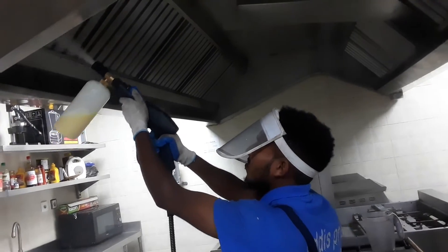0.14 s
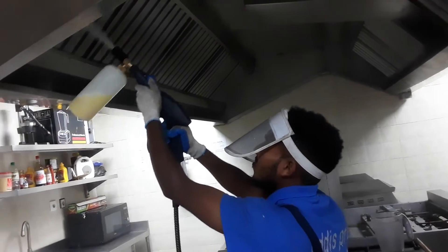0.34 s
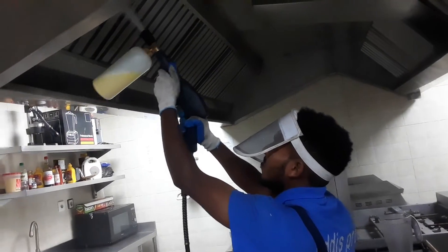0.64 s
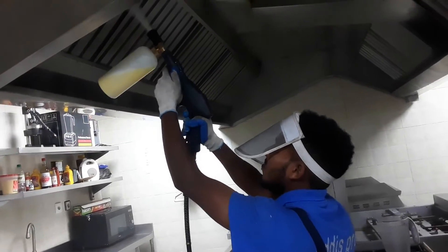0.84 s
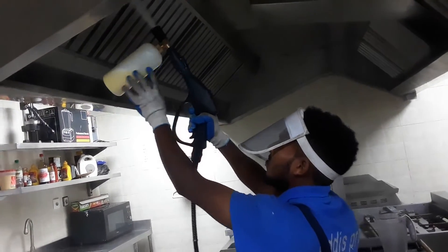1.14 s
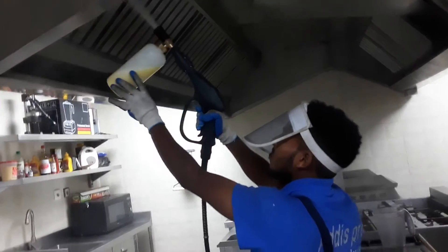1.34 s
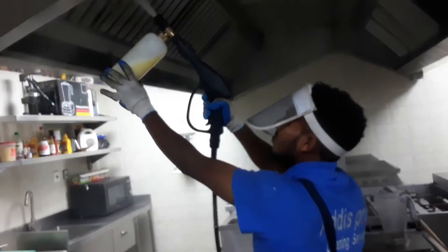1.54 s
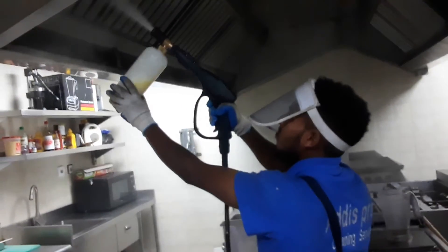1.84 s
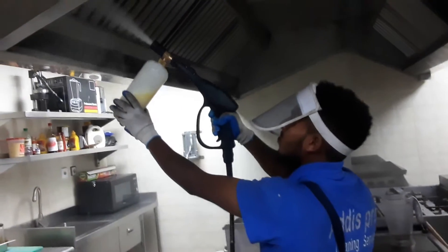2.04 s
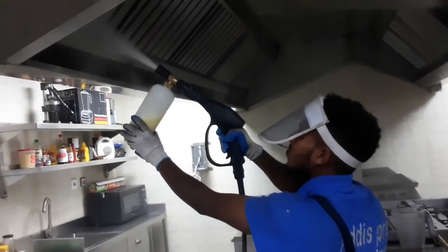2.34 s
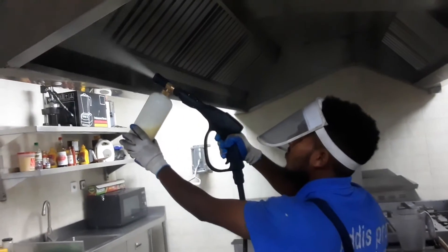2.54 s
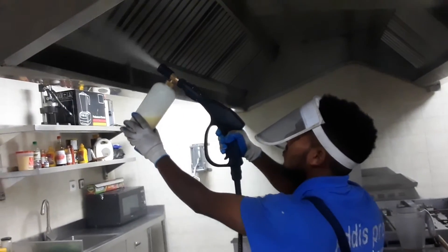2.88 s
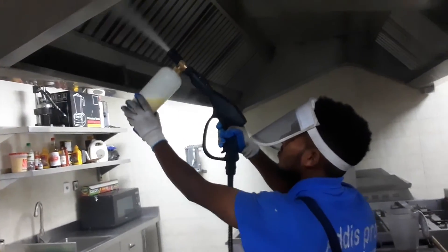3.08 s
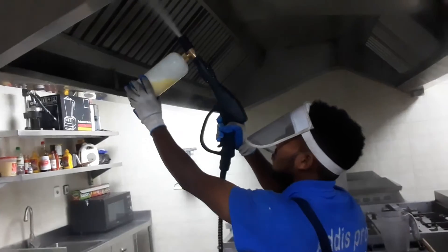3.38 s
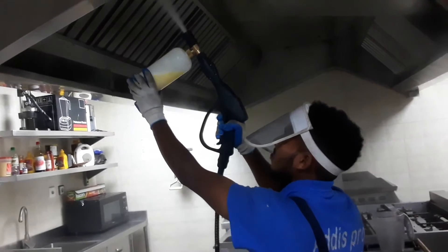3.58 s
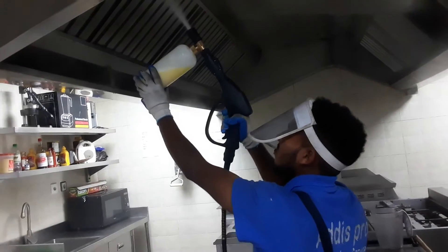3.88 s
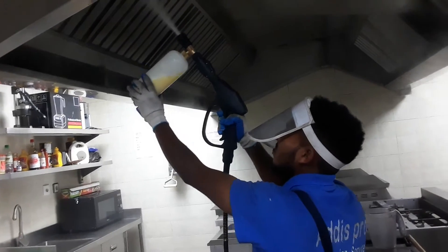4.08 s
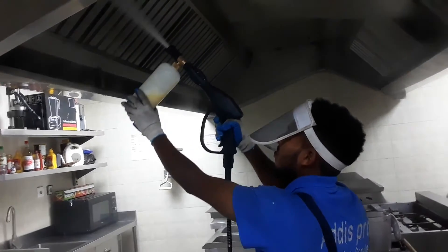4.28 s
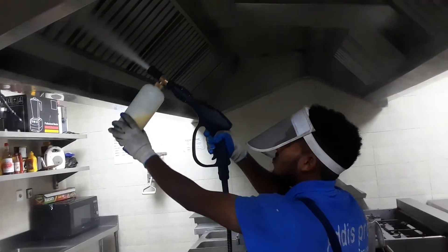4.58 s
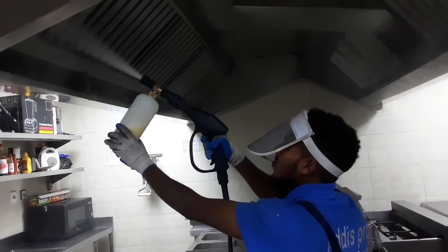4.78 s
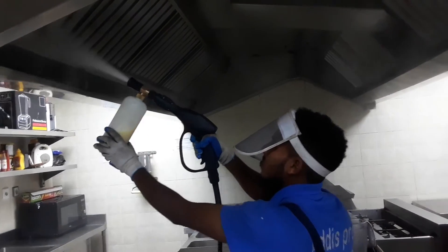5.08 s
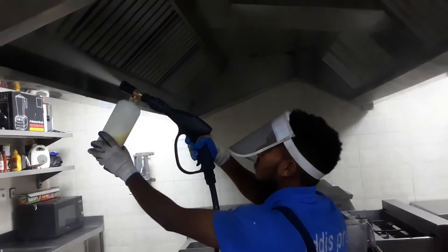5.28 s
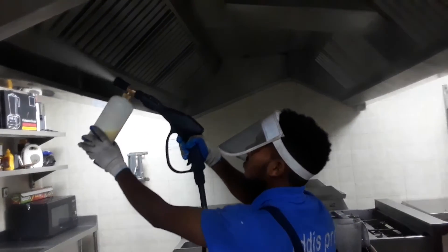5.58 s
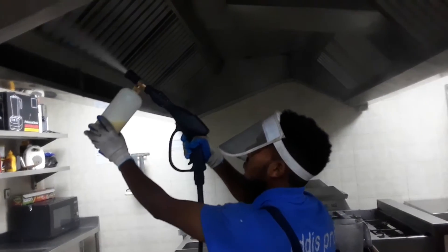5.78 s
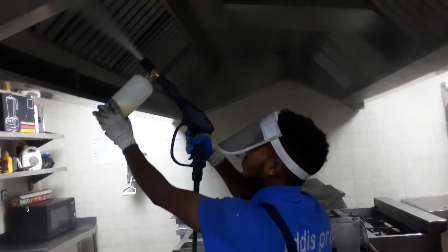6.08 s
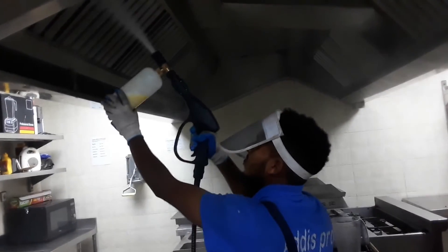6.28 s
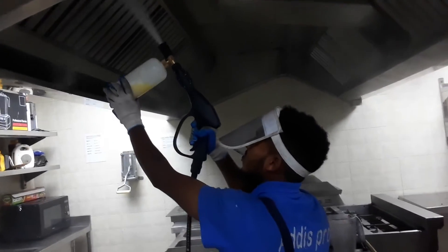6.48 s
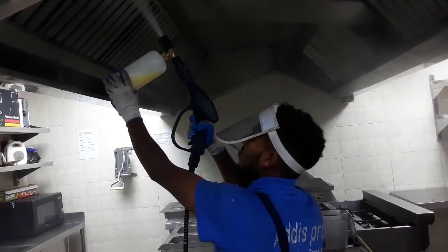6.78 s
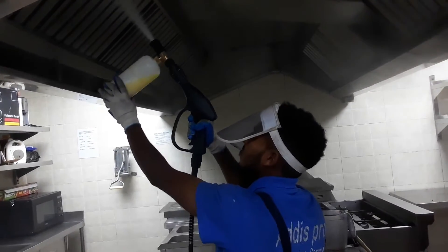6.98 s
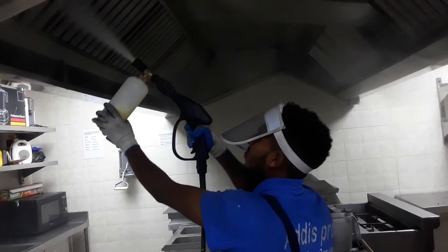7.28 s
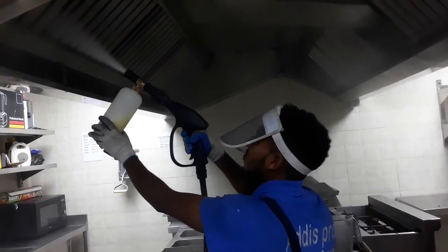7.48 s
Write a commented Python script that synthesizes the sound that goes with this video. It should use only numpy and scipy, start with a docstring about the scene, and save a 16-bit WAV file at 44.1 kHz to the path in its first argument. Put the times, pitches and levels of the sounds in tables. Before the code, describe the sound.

A steam gun hisses loudly and without a break for about seven and a half seconds, sweeping over the steel filters of an extractor hood in a tiled kitchen. The hiss is bright, with two breathy, whistle-like bands, one high and one higher, above a lighter roar. Close reflections slowly shift its colour as the nozzle moves. It swells slightly at the start and around 2 and 6 seconds, and thin rings come and go, near 0.7, 2.4, 4.3, 6 and 7.4 seconds. Fine spray sizzles faintly around 4, 6.5 and 7.1 seconds. A faint low air rumble runs underneath. Soft puffs of air bump the single microphone between 2.3 and 3 seconds, around 5 and near the end, with the strongest thump at 5.3. The hood gives very soft, dull knocks at about 3.2 and 5.4 seconds.

```python
"""In a tiled kitchen, a steam gun is swept slowly over the steel filters of an extractor hood.
The jet sounds the two lowest resonances of its nozzle, hisses above them, and roars and sizzles
on the steel. Echoes that shift with the nozzle keep changing the colour of this noise.
Stirred air rumbles underneath, puffs of air bump the single microphone, and the hood gives
a few soft knocks."""
import sys
import numpy as np
from scipy import signal
from scipy.fft import rfft, irfft, next_fast_len
from scipy.io import wavfile
from scipy.ndimage import uniform_filter1d, minimum_filter1d

SR = 44100
rng = np.random.default_rng(int(sys.argv[2]) if len(sys.argv) > 2 else 0)


def to_wav(s):
    """Save 16-bit WAV."""
    ch = np.atleast_2d(s).T  # columns
    pcm = np.round(np.clip(ch, -1, 1) * 32767)  # PCM
    wavfile.write(sys.argv[1], SR, pcm.astype(np.int16))


N = 336483
TIME = np.arange(N) / SR

# The nozzle's path along the filters. Each row: time in seconds, how far it is lowered in metres.
NOZZLE_PATH = [(0, 0.16), (.45, 0.074), (1.55, 0.0038), (2.3, 0.21), (2.75, 0.26), (3.3, 0.089),
               (3.9, 0.027), (4.8, 0.23), (5.5, .3), (6.1, .18), (6.8, .13), (7.63, .29)]
# The treble rises and falls as the gun turns. Each row: time in seconds, change of level in dB.
TREBLE_CURVE = [(0, 1.9), (1.4, 1.5), (2.9, 0.5), (3.65, -2), (4.6, -2.1), (4.9, 0.8), (5.48, 1.5),
                (5.85, -1), (6.85, -1.8), (7.63, 1)]
# The colours of the jet's five parts and of the room. Each row: frequency in Hz, relative level in dB.
ROAR_COLOUR = [(350, -57), (480, -30), (620, -19.5), (715, -8), (830, -12.5), (925, -6.5), (1060, -12.5),
               (1230, -7), (1390, -0.5), (1540, -3.5), (1750, -5), (2300, -36)]
LOW_TONE_COLOUR = [(1300, -39.5), (1650, -29.5), (1900, -7.5), (2100, -1), (2350, 0), (2600, -.5),
                   (2900, -2.5), (3250, -12), (3900, -12.5), (4400, -17.5), (5400, -25.5)]
HIGH_TONE_COLOUR = [(3600, -33), (4400, -15), (5200, -5.5), (5900, 2), (6500, 2.5), (6950, 1.5), (7350, -7),
                    (7800, -19.5), (8600, -33)]
HISS_COLOUR = [(6000, -54), (7800, -5), (8700, 0.5), (10000, 2.5), (11000, 4), (12500, 2), (15800, 3)]
SPRAY_COLOUR = [(9000, -34), (11500, -2), (13500, 4), (15800, -1)]
RUMBLE_COLOUR = [(20, -28), (35, -17), (55, -9), (80, -2), (130, -0.5), (250, 0), (400, -1), (600, 1.5),
                 (1200, -18)]
# The jet surges. Each row: middle in seconds, length in seconds, then the change in dB
# of the roar, of the low tone and of the high tone.
JET_SURGES = [(.17, 0.41, 2.5, .5, -1.0), (2.02, 0.71, 2.5, 0.5, 0.8), (2.9, .4, .3, 0, 1.4),
              (4.28, 0.32, 0, 1.1, 0), (6.017, 0.61, 1.0, 1.3, -0.9), (7.5, 0.23, -.8, 1.2, 0.5)]
# The hiss rings briefly at one pitch, then fades. Each row: middle in seconds, length in seconds,
# pitch in Hz, level in dB above the noise around that pitch.
BRIEF_RINGS = [(.3, 0.66, 920, 2), (.66, 0.31, 2555, 9), (1.15, 0.57, 2460, 6), (1.4, 0.66, 2610, 0),
               (2.35, 0.56, 2110, 5.5), (2.4, 0.36, 6290, 0), (2.42, .23, 5980, 10), (4.3, 0.33, 2590, 7),
               (5.25, .53, 6130, 3), (6.08, 0.16, 2340, 10.5), (6.3, 0.59, 2495, 7.5), (6.7, 0.75, 6600, 6),
               (6.87, 0.4, 6080, 6), (7.43, 0.42, 2320, 8)]
# Fine spray sizzles on the steel. Each row: middle in seconds, length in seconds, level in dB.
SPRAY_BURSTS = [(4.05, 1, -45), (6.48, 0.45, -38), (7.13, 0.48, -40)]
# Puffs of air hit the microphone. Each row: start in seconds, level in dB.
AIR_PUFFS = [(.631, -35), (2.281, -24.5), (2.633, -31), (2.683, -27), (2.782, -20.5), (3.059, -31),
             (4.31, -33), (4.893, -30), (4.969, -29.5), (5.171, -28), (5.269, -12), (7.329, -34),
             (7.395, -32), (7.445, -29), (7.525, -32.5)]
# Knocks on the hood. Each row: start in seconds, level in dB, hardness as a tilt in dB per octave.
HOOD_KNOCKS = [(3.19, -41.5, 1), (5.414, -54, 7), (5.43, -48, 12.5), (5.451, -50, 13)]
# The notes of the steel sheet. Each row: pitch in Hz, relative level in dB, seconds to fade by 60 dB.
HOOD_NOTES = [(141, -5, 0.86), (200, -3, 0.98), (310, 0.5, 0.95), (350, -1, 0.74), (398, 3, .25),
              (450, 1, 0.62), (607, -6, .3), (836, 8.5, .12), (910, 6, .12)]

LOW_TONE_HZ, HIGH_TONE_HZ = 2451, 6307   # the nozzle's two resonances at mid sweep
MID_SWEEP_M = 0.17


def from_db(db):
    """Turn decibels into a factor to multiply by."""
    return 10 ** (np.asarray(db) / 20)


def rms_one(x):
    """Scale a signal to an average power of 1."""
    return x / np.sqrt(np.mean(x ** 2) + 1e-20)


def evened(x, span_s):
    """Hold the power near 1 over spans of this length."""
    span = int(span_s * SR)
    return x / np.sqrt(uniform_filter1d(uniform_filter1d(x ** 2, span), span) + 1e-12)


def filtered(x, gain_at):
    """Turn each frequency up or down by the factor gain_at(hz)."""
    size = next_fast_len(N + 8192)
    hz = np.maximum(np.arange(size // 2 + 1) * SR / size, 1)
    return irfft(rfft(x, size) * gain_at(hz), size)[:N]


def coloured(x, colour):
    """Shape noise by a colour table, almost silent beyond its ends, and scale it to power 1."""
    points_hz, db = np.transpose(colour)
    return rms_one(filtered(x, lambda hz: from_db(np.interp(np.log(hz), np.log(points_hz), db, -90, -90))))


def drift(rate_hz):
    """A random wobble of typical size 1, mostly slower than rate_hz."""
    return rms_one(filtered(rng.standard_normal(N), lambda hz: 1 / (1 + (hz / rate_hz) ** 2)))


def swell(middle_s, length_s):
    """A smooth rise and fall of height 1."""
    return np.exp(-(2 * (TIME - middle_s) / length_s) ** 2)


def clicks(events):
    """One single-sample click for each pair of start in seconds and level in dB."""
    out = np.zeros(N) + 1e-18
    for start_s, db in events:
        out[round(start_s * SR)] += from_db(db)
    return out


def steam_jet():
    """Swirling steam sounds the nozzle, a short tube with resonances near 1 : 3, and drums on the steel."""
    treble_db = np.interp(TIME, *np.transpose(TREBLE_CURVE))
    lowered_m = np.interp(TIME, *np.transpose(NOZZLE_PATH))
    below_mid_m = lowered_m - MID_SWEEP_M
    eddies = moving_echoes(rng.standard_normal(N), lowered_m)
    eddies = brief_rings(eddies)
    sputter = drift(6.0)   # wet steam leaves unevenly

    def part(sound, level_db, treble_share, db_per_m, sputter_db, flicker_db):
        """One part's level follows the treble, the sweep, the shared sputter and its own flicker."""
        slow_db = level_db + treble_share * treble_db + db_per_m * below_mid_m
        return evened(sound, span_s=0.1) * from_db(slow_db + sputter_db * sputter + flicker_db * drift(39))

    # Both resonances rise in pitch as the nozzle is lowered.
    low = resonance(eddies, LOW_TONE_COLOUR, LOW_TONE_HZ + 280 * below_mid_m, rest_hz=2476, reach=0.024)
    high = resonance(eddies, HIGH_TONE_COLOUR, HIGH_TONE_HZ + 120 * below_mid_m, rest_hz=6320, reach=0.019)
    roar, hiss = coloured(eddies, ROAR_COLOUR), coloured(eddies, HISS_COLOUR)
    roar = part(roar, level_db=-31.5, treble_share=0.61, db_per_m=-1.5, sputter_db=0.7, flicker_db=0.96)
    low = part(low, level_db=-15, treble_share=0.24, db_per_m=-2, sputter_db=-0.2, flicker_db=0)
    high = part(high, level_db=-17.5, treble_share=0.57, db_per_m=6, sputter_db=0.8, flicker_db=0.5)
    hiss = part(hiss, level_db=-30.5, treble_share=1, db_per_m=1, sputter_db=0.5, flicker_db=0.72)
    surges_db = sum(np.outer(db, swell(middle_s, length_s)) for middle_s, length_s, *db in JET_SURGES)
    roar_surge, low_surge, high_surge = from_db(surges_db)
    return roar_surge * roar + low_surge * low + high_surge * high + hiss + spray_sizzle(eddies)


def moving_echoes(x, lowered_m, first_s=0.002, last_s=0.036, echo_db=-8.5, fade_s=0.022, count=26):
    """Add echoes from the hood and walls, whose paths stretch or shrink as the nozzle moves."""
    out, samples = x.copy(), np.arange(N)
    sideways_m = 0.008 * drift(0.8)
    for k, (place, heading) in enumerate(rng.random((count, 2))):
        delay_s = first_s + (last_s - first_s) * (k + place) / count
        stretch_m = lowered_m * np.cos(2 * np.pi * heading) + sideways_m * np.sin(2 * np.pi * heading)
        lag = np.round((delay_s + stretch_m / 343) * SR).astype(int)   # sound travels 343 m a second
        out += (-1) ** k * from_db(echo_db) * np.exp(-delay_s / fade_s) * x[(samples - lag) % N]
    return out


def resonance(x, colour, centre_hz, rest_hz, reach):
    """A nozzle tone slides in pitch by blending a slightly lower and a slightly higher tuning."""
    lower, higher = (coloured(x, np.array(colour) * [1 + shift, 1]) for shift in (-reach, reach))
    share = np.clip(0.5 + 0.5 * (centre_hz / rest_hz - 1) / reach, 0, 1)
    return (1 - share) * lower + share * higher


def room_rumble(level_db, wobble_db):
    """Stirred air makes a low, uneven rumble."""
    return coloured(rng.standard_normal(N), RUMBLE_COLOUR) * from_db(level_db + wobble_db * drift(26))


def brief_rings(x, width_hz=49, faint_count=14, faint_s=0.3, faint_db=3, pitch_scatter=0.098):
    """Now and then the hiss rings briefly at one pitch, then fades: a narrow band of noise is added."""
    out, noise = rms_one(x), rng.standard_normal(N)
    faint = []   # extra rings come by chance, near each of the two resonances in turn
    for k, (when, pitch) in enumerate(rng.random((faint_count, 2))):
        middle_s = (k + when) / faint_count * N / SR
        hz = (LOW_TONE_HZ, HIGH_TONE_HZ)[k % 2] * (1 + pitch_scatter * (2 * pitch - 1))
        faint.append((middle_s, faint_s, hz, faint_db))
    for middle_s, length_s, hz, db in BRIEF_RINGS + faint:
        band = signal.lfilter(*signal.iirpeak(hz, hz / width_hz, fs=SR), noise)
        out += from_db(db) * swell(middle_s, length_s) * band
    return out


def air_puffs(low_hz, high_hz, swing_hz, swing_width_hz, swing_share):
    """Each puff is a brief push of air that swings back and forth in the microphone's bass filter."""
    bass_cut = signal.butter(2, low_hz, "high", fs=SR, output="sos")
    treble_cut = signal.butter(2, high_hz, "low", fs=SR, output="sos")
    bump = signal.sosfilt(np.vstack([bass_cut, treble_cut]), signal.unit_impulse(4096))
    swing = signal.lfilter(*signal.iirpeak(swing_hz, swing_hz / swing_width_hz, fs=SR), bump)
    puff = bump + swing_share * swing
    return signal.fftconvolve(clicks(AIR_PUFFS), puff / np.abs(puff).max())[:N]


def puff_ticks(above_hz, fade_s):
    """Air rushing through the microphone's opening adds a thin tick, heard on the strongest puffs."""
    fades = signal.lfilter([1], [1, -np.exp(-1 / (fade_s * SR))], clicks(AIR_PUFFS))
    rush = fades * rng.standard_normal(N)
    return signal.sosfilt(signal.butter(4, above_hz, "high", fs=SR, output="sos"), rush)


def hood_knocks(dull_above_hz):
    """Soft blows set the steel sheet ringing; harder ones bring out its higher notes."""
    out = np.zeros(N)
    for hz, note_db, ring_s in HOOD_NOTES:
        octaves = np.log2(hz / 400)
        blows = clicks([(s, db + note_db + hardness * octaves) for s, db, hardness in HOOD_KNOCKS])
        decay, angle = from_db(-60 / (ring_s * SR)), 2 * np.pi * hz / SR   # both per sample
        note = signal.lfilter([0, np.sin(angle)], [1, -2 * decay * np.cos(angle), decay * decay], blows)
        out += note * rng.choice([-1, 1])
    return signal.sosfilt(signal.butter(2, dull_above_hz, fs=SR, output="sos"), out)


def spray_sizzle(eddies, flicker_db=3):
    """Bursts of fine spray hit the steel with a high, flickering sizzle."""
    bursts = sum(from_db(db) * swell(middle_s, length_s) for middle_s, length_s, db in SPRAY_BURSTS)
    return coloured(eddies, SPRAY_COLOUR) * bursts * from_db(flicker_db * drift(36))


def limited(x, ceiling_db):
    """Turn the level down for a few milliseconds around each peak that would pass the ceiling."""
    span = int(0.004 * SR)
    allowed = np.minimum(1, from_db(ceiling_db) / (np.abs(x) + 1e-9))
    return x * uniform_filter1d(minimum_filter1d(allowed, span), span)


def scene():
    """Everything reaches one microphone, so both ears hear the same."""
    puffs = air_puffs(low_hz=64, high_hz=250, swing_hz=72, swing_width_hz=26, swing_share=0.76)
    ticks = puff_ticks(above_hz=12500, fade_s=0.003)
    jet = steam_jet()
    knocks = hood_knocks(dull_above_hz=1000)
    rumble = room_rumble(level_db=-47.5, wobble_db=1.5)
    mono = jet + rumble + puffs + ticks + knocks
    return np.array([mono, mono])


def record(dry):
    """Hold down the peaks and cut off the highest treble steeply."""
    cutoff_hz, slope_width_hz = 15750, 150
    held = [limited(x, ceiling_db=-0.6) for x in dry]
    return np.array([filtered(x, lambda hz: np.clip((cutoff_hz - hz) / slope_width_hz + 0.5, 0, 1))
                     for x in held])


dry = scene()
out = record(dry)
to_wav(out)
```